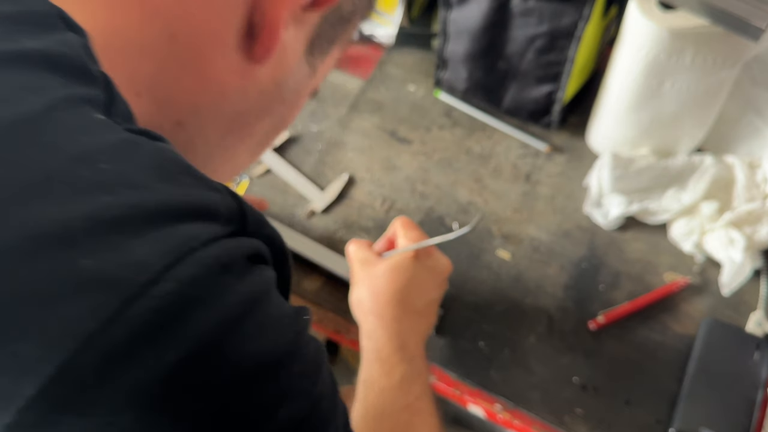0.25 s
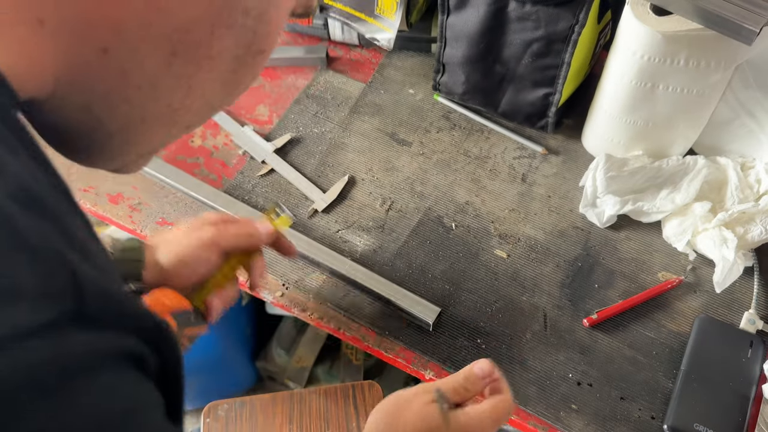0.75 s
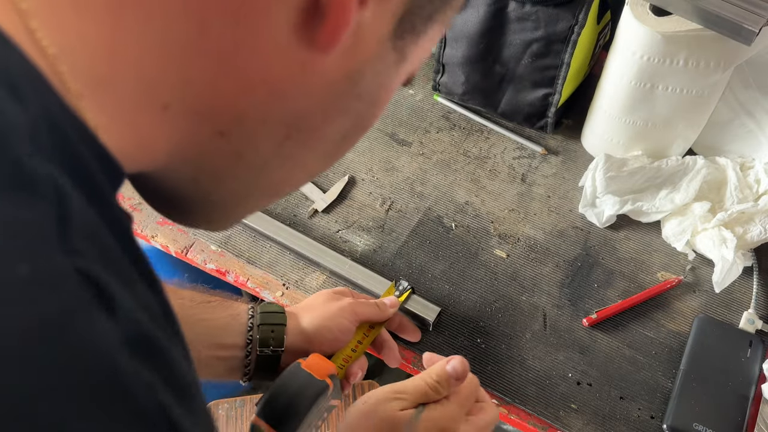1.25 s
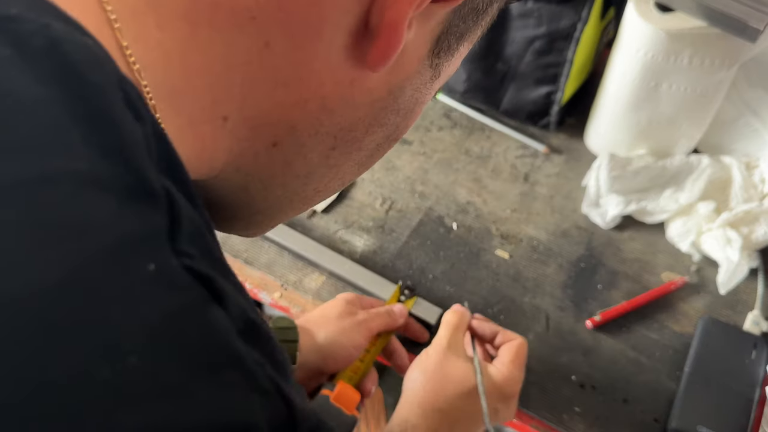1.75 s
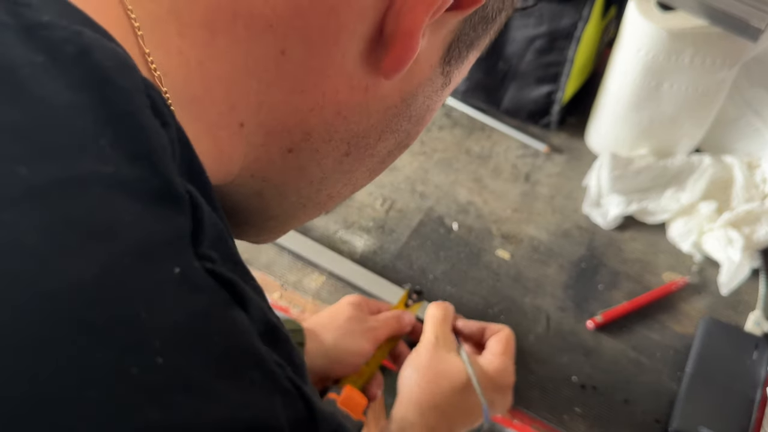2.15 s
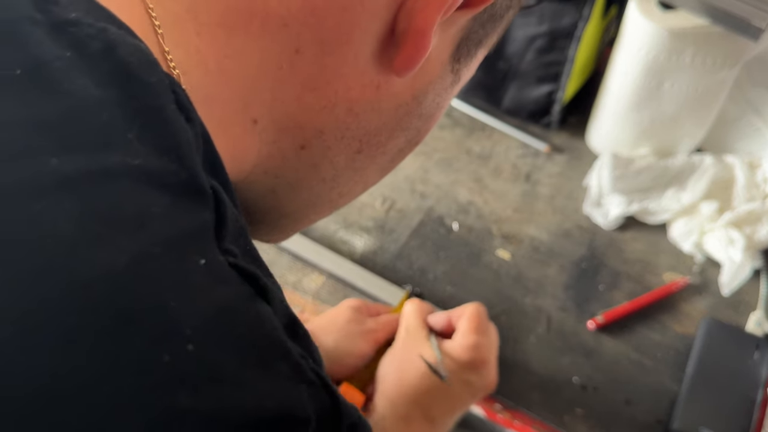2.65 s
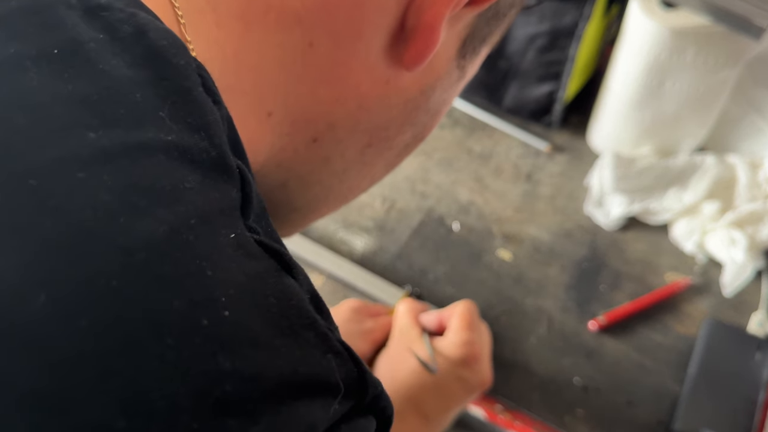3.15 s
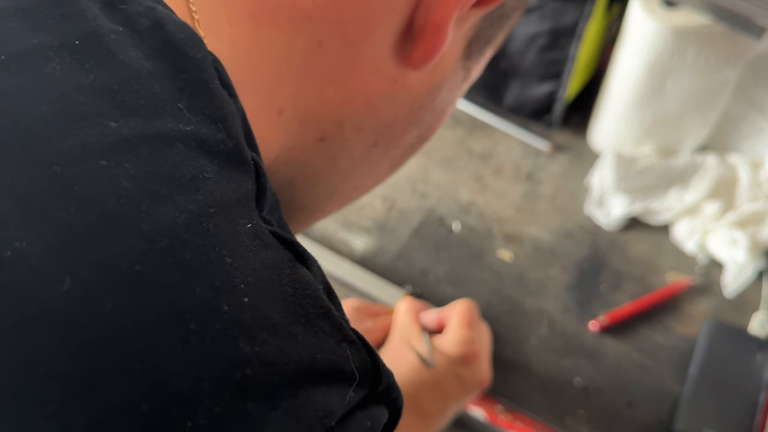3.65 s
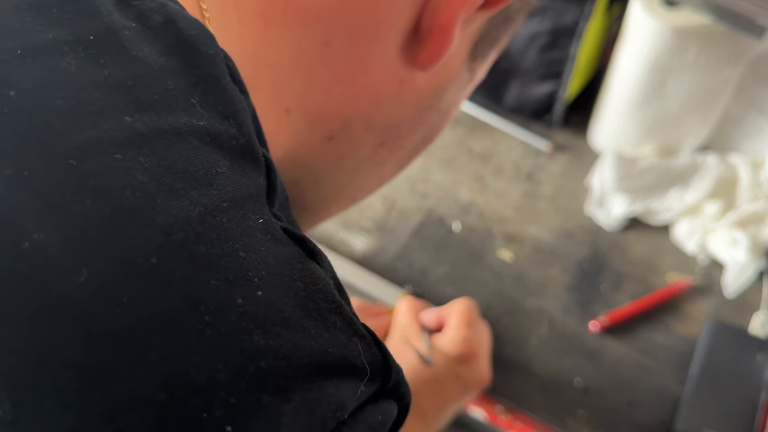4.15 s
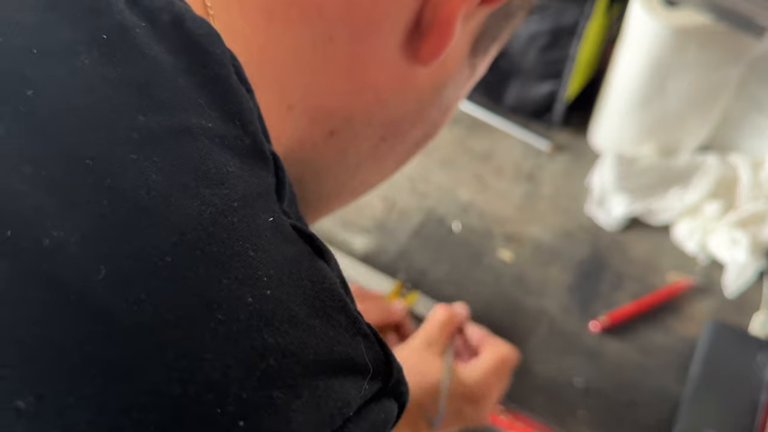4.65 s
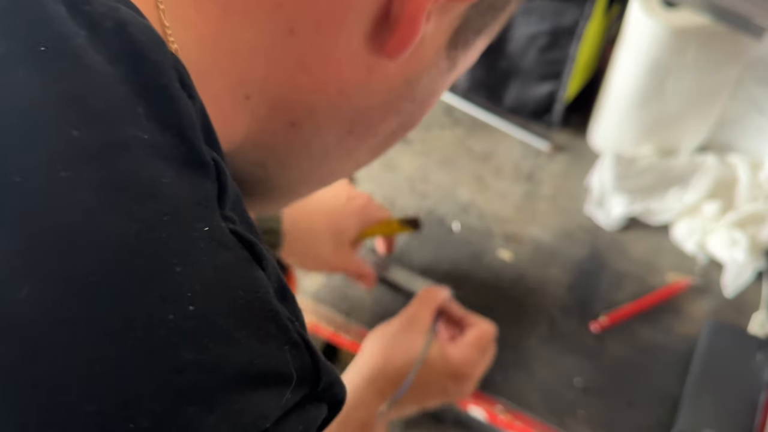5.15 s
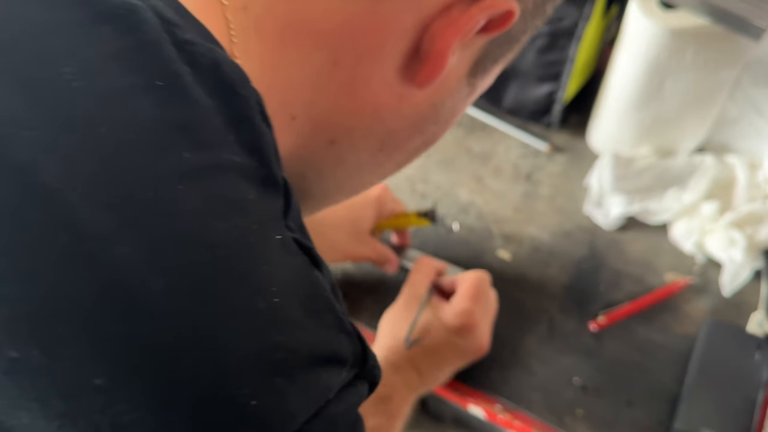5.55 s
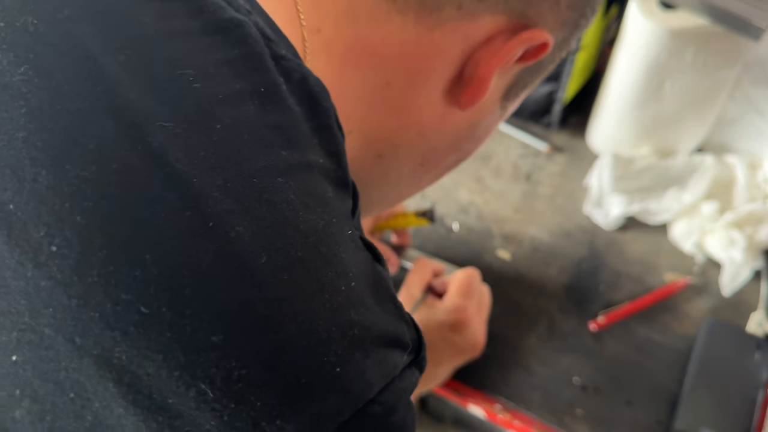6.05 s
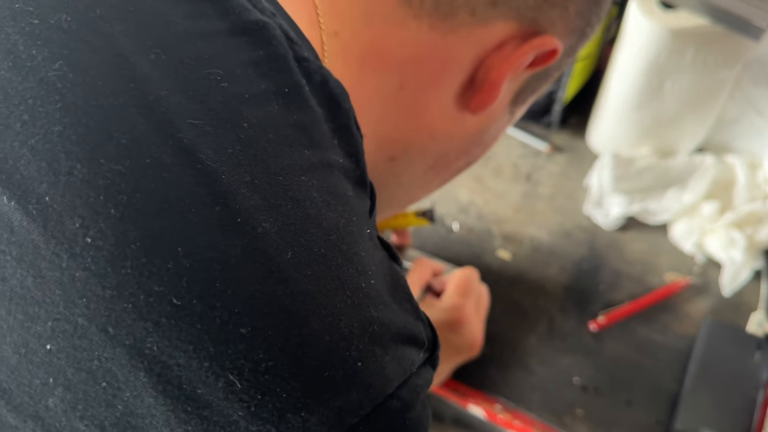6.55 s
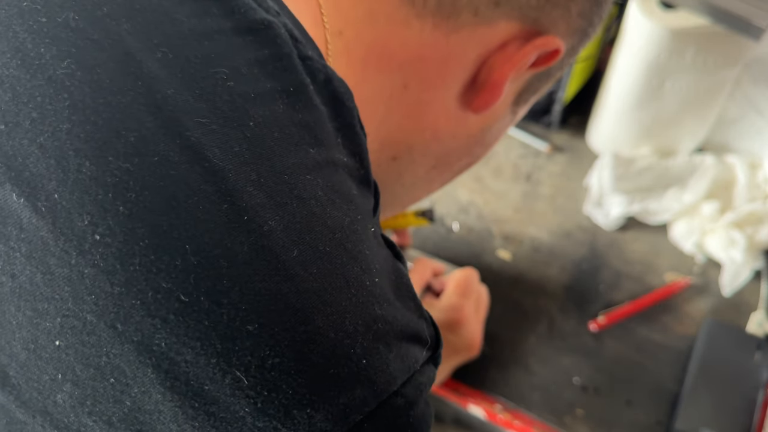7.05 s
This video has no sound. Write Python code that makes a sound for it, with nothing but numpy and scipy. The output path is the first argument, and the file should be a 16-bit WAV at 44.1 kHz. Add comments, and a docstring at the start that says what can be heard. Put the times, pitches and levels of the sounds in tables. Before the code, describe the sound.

In a quiet workshop, distant birds whistle throughout. A steel measuring tape ticks faintly, then snaps in a tight bright cluster just after one second. After a long near-silence, a square metal tube drops on the bench with a hard, booming clack, chatters, and drags briefly as the plastic tape case rocks. Soft hollow taps and hand shuffling finish. Close phone microphone, stereo, little reverberation.

```python
"""Bird whistles over a quiet room come first; almost at once a steel tape ticks and a square steel tube is tapped.
The tape also rustles and its plastic case rocks; the tube drops, chatters and drags on a bench that booms.
Ticks are short noise bursts with a dense ring; blows ring banks of decaying modes; drags and rubs are random slips.
Birds are gliding sines, an insect is throbbing narrow noise and the room is shaped noise."""
import sys
import numpy as np
from scipy import signal
from scipy.fft import rfft, irfft
from scipy.io import wavfile
from scipy.ndimage import uniform_filter1d

SR = 44100
rng = np.random.default_rng(int(sys.argv[2]) if len(sys.argv) > 2 else 0)


def output_pcm(signal):
    """Save a mono or channel-first signal as 16-bit PCM at the path in sys.argv[1].

    Samples are clipped to [-1, 1] before scaling.
    """
    pcm = np.clip(np.atleast_2d(signal).T, -1, 1) * 32767
    wavfile.write(sys.argv[1], SR, np.round(pcm).astype(np.int16))


N = 321489
T = np.arange(N) / SR


def amp(db):
    """Gain of a level in dB."""
    return 10 ** (np.asarray(db) / 20)


def unit(x):
    """Scaled to rms 1."""
    return x / np.sqrt(np.mean(x ** 2))


def band(x, lo_hz, hi_hz):
    """Steep band-pass."""
    return signal.sosfilt(signal.butter(3, [lo_hz, hi_hz], "band", fs=SR, output="sos"), x)


def decay(t, t60_s):
    """Exponential fade that loses 60 dB in t60_s."""
    return np.exp(-np.log(1000) * t / t60_s)


def ring(force, modes):
    """A force sets each decaying mode ringing."""
    out = 0
    for hz, db, t60_s in modes:
        pole = np.exp(2j * np.pi * hz / SR - np.log(1000) / (t60_s * SR))
        out = out + amp(db) * signal.lfilter([1], [1, -pole], force).imag
    return out


def walk(count, smooth):
    """Smooth random wander of rms 1; smooth is in samples."""
    return unit(uniform_filter1d(uniform_filter1d(rng.standard_normal(count), smooth), smooth))


def curve(rows, column):
    """Gain along a dB column, silent outside the rows."""
    rows = np.array(rows)
    return amp(np.interp(T, rows[:, 0], rows[:, column], left=-150, right=-150))


def grit(rate_hz, scatter_db):
    """Random slips, a few much larger than the rest."""
    slips = (rng.random(N) < rate_hz / SR) * rng.standard_normal(N)
    return unit(slips * amp(scatter_db * rng.exponential(size=N)))


def add(out, start_s, x):
    """Mixes x in at start_s."""
    i = int(start_s * SR)
    out[i:i + len(x)] += x[:N - i]


def blow(modes, peak_db, push_s, crack):
    """A short push rings the modes, each more or less at random; rough contact adds a crack of noise."""
    t = T[:SR // 2]
    offsets_db = 1.5 * rng.standard_normal(len(modes))
    struck = [(hz, db + offset_db, t60_s) for (hz, db, t60_s), offset_db in zip(modes, offsets_db)]
    click = 1. * (t == 0)
    sound = ring(click, struck) * (1 - np.exp(-t / push_s))
    rough = unit(band(rng.standard_normal(len(t)), modes[0][0], modes[-1][0] * 1.166))
    rough = rough * (t / push_s).clip(0, 1) * np.exp(-t / 0.021)
    sound = sound / np.abs(sound).max() + crack * rough
    return amp(peak_db) * sound / np.abs(sound).max()


def tail(x, t60_s, db, damp_hz):
    """Reflections: a decaying noise for each port, band-limited from 350 Hz to damp_hz."""
    t = T[:SR]
    ports = []
    for _ in range(2):
        echo = band(rng.standard_normal(SR), 350, damp_hz) * decay(t, t60_s) * (t > .006)
        echo = echo / np.sqrt(np.sum(echo ** 2))
        ports.append(amp(db) * signal.fftconvolve(x, echo)[:N])
    return np.array(ports)


# steel tape ticks: start_s, ring_db (peak), brightness_db (top over ring, before TICK_TOP_DB),
# t60_s (limited to 0.01-0.4 when played), middle_db (peak)
TAPE_TICKS = [(0.1, -56, 3.5, 0.22, -65), (0.334, -62.5, 4, 0.43, -62), (0.363, -68, 11, 0.087, -67),
              (0.6, -62.5, 1, 0.073, -65), (0.7954, -60, -4, 0.11, -50), (1.1698, -42.5, 5, 0.06, -41),
              (1.191, -27.5, 0, 0.15, -40), (1.195, -25, -5, 0.14, -45), (1.2106, -24.5, 6, 0.043, -38),
              (1.2135, -22.5, -1, 0.04, -42), (1.2315, -40.5, -1, 0.3, -50), (1.386, -52.5, 11.5, 0.4, -58),
              (1.439, -30.5, 0, 0.14, -54.5), (1.97, -53.5, -5, 0.41, -50.5),
              (2.0927, -69, 17.5, 0.091, -73), (4.57, -47.5, 13, 0.13, -55), (4.6679, -32, 0, 0.89, -41.5),
              (4.8985, -45.5, 5, 0.26, -44.5), (5.077, -50.5, -13, 0.29, -65), (5.302, -50, -1, 0.028, -50),
              (6.152, -70.5, 3, 0.08, -71.5), (7.1105, -50.5, 1, 0.044, -57)]
# ring of the thin steel tape: pitch_hz, level_db, t60_s
TAPE_MODES = [(7843, -14, .2), (8340, -12, .15), (8650, -10, .15), (8995, -6, .15), (9207, -3, .12),
              (9410, 0, .15), (9666, -4, .12), (9878, -8, .2), (10170, -4, .08), (10440, -8, .12),
              (11030, -10, .1)]
MIDDLE_HZ, RING_HZ, SHEEN_HZ = (2500, 6200), (7900, 10600), (12200, 16500)
TICK_TOP_DB, TICK_RISE_S, MIDDLE_FADE_S = -6, 0.001167, 0.017


def ticks():
    """The thin tape clicks as flickering noise with a dense ring; its middle band sheds level early."""
    out, t = np.zeros(N), T[:SR // 3]
    for start_s, ring_db, bright_db, t60_s, middle_db in TAPE_TICKS:
        fade = decay(t, np.clip(t60_s, .01, .4)) + np.exp(-t / 0.004)
        flicker_db = 4 * np.exp(-t / .05) * walk(len(t), smooth=60)
        attack = (t / TICK_RISE_S).clip(0, 1)
        noise = rng.standard_normal(len(t)) * fade * amp(flicker_db) * attack
        contact = noise * (t < .006)
        body = unit(band(noise, *RING_HZ)) + 0.69 * unit(ring(contact, TAPE_MODES))
        top = band(noise, *SHEEN_HZ)
        middle = band(noise * (0.36 + np.exp(-t / MIDDLE_FADE_S)), *MIDDLE_HZ)
        top_db = ring_db + TICK_TOP_DB + bright_db
        for db, layer in ((ring_db, body), (top_db, top), (middle_db, middle)):
            add(out, start_s, amp(db) * layer / np.abs(layer).max())
    return out


# the tube lands and bounces: start_s, bending_db (0.5-1.7 kHz), wall_db,
# free_share (part of the free ring time that the hand leaves)
TUBE_BOUNCES = [(4.698, -20, -27.5, 1), (4.715, -27.5, -25, 0.75), (4.73, -31, -26, 0.49),
                (5.3, -59.5, -48.5, .25), (5.615, -67, -61.5, 0.16)]
# bending of the tube: pitch_hz, level_db, t60_s
BENDING_MODES = [(579, -12, .1), (694, -10, .12), (754, -3, .12), (888, -6, .12), (1039, -3, .12),
                 (1250, -9, .08), (1444, -6, .13), (1626, -12, .1)]
# ring of the tube wall: pitch_hz, level_db, t60_s (free of the hand)
WALL_MODES = [(1941, -11, .12), (1996, -6, .14), (2197, -12, .12), (3123, -7, .12), (3179, 0, .12),
              (3246, -18, .1), (3682, -22, .12), (4509, -5, .15), (5120, -22, .13), (5520, -27, .12),
              (5959, -24, .13), (6500, -30, .12), (7397, -23, .16), (8123, -18, .13)]


def bounces():
    """Each landing bends the tube and rings its wall, which the hand damps."""
    out = np.zeros(N)
    for start_s, bending_db, wall_db, free_share in TUBE_BOUNCES:
        held = [(hz, db, t60_s * free_share) for hz, db, t60_s in WALL_MODES]
        add(out, start_s, blow(BENDING_MODES, bending_db, 0.00041, 0.41))
        add(out, start_s, blow(held, wall_db, 0.009, 0.0358))
    return out


# bench boom: pitch_hz, level_db, t60_s
BOOM_MODES = [(58, -22, .2), (82, 2, .3), (116, -3, .25)]
# bench body: pitch_hz, level_db, t60_s
BENCH_MODES = [(187, -10, .09), (250, -16, .08), (317, -2, .06), (378, 0, .06), (460, -11, .05)]
# low hollow tones: pitch_hz, level_db, t60_s
CAVITY_MODES = [(545, 0, .07), (610, -6, .05)]


def bench_blow(out, start_s, boom_db, bench_db, cavity_db):
    """Bench body, hollow tone, then the boom, which slower bending waves bring last."""
    add(out, start_s + 0.007, blow(BOOM_MODES, boom_db, 0.0039, 0))
    add(out, start_s + 0.0017, blow(BENCH_MODES, bench_db, 0.0015, .45))
    add(out, start_s + .004, blow(CAVITY_MODES, cavity_db, .006, .15))


# hands, tape case and tube thud on the bench: start_s, level_db, boom_db (weight over level_db)
BENCH_THUDS = [(0.112, -47.5, -28), (0.125, -53.5, 6.5), (0.336, -53.5, -2.5), (1.21, -50.5, -2.5),
               (1.447, -56.5, -3), (1.989, -57.5, -27), (2.468, -51.5, -11.5), (4.476, -52, -15),
               (4.697, -28.5, 6), (4.7022, -16, -9), (4.847, -45.5, 3.5), (4.907, -45.5, 7),
               (4.952, -51, 8), (5.005, -47.5, 7.5), (5.035, -50, 6.5)]
THUD_CAVITY_DB = -20  # hollow tone over the thud


def thuds():
    """Hands, case and tube knock the bench into its body tones and boom."""
    out = np.zeros(N)
    for start_s, db, weight_db in BENCH_THUDS:
        bench_blow(out, start_s, db + weight_db, db, db + THUD_CAVITY_DB)
    return out


# scriber and fingers tap the tube: start_s, level_db, low_db (lowest hollow tone over level_db),
# second_db (added to the second hollow mode)
TUBE_TAPS = [(0.097, -63.5, 7.5, -8), (5.689, -56.5, 3.5, -20), (5.716, -48.5, 0, -18),
             (5.84, -65.5, 8.5, -14), (5.854, -50, 0.5, -15), (6.309, -59, -1, -16),
             (6.424, -45.5, -17, -6), (6.899, -50.5, -19, 1.5), (7.016, -55.5, -12, -10),
             (7.112, -48.5, -24, -7)]
# hollow tube tones: pitch_hz, level_db, t60_s
HOLLOW_MODES = [(1025, 0, .03), (1560, 0, .025), (2300, -20, .025), (3400, -24, .025), (4450, -21, .025)]
TAP_BENCH_DB, TAP_BOOM_DB = -3.5, -9  # what a tap passes on to the bench


def gripped(modes, second_db):
    """The hand's grip shifts each tone a little from tap to tap and sets the second tone's level."""
    held = []
    for k, (hz, db, t60_s) in enumerate(modes):
        shifted_hz = hz * (1 + .02 * rng.standard_normal())
        held.append((shifted_hz, db + second_db * (k == 1), t60_s))
    return held


def taps():
    """The hollow tap comes first, then the bench answers."""
    out = np.zeros(N)
    for start_s, db, low_db, second_db in TUBE_TAPS:
        add(out, start_s, blow(gripped(HOLLOW_MODES, second_db), db, .002, .1))
        bench_blow(out, start_s, db + TAP_BOOM_DB, db + TAP_BENCH_DB, db + low_db)
    return out


# the plastic tape case rocks on the bench: start_s, level_db (peak)
CASE_ROCKS = [(4.845, -35.5), (4.951, -42.5), (5.004, -53), (5.037, -52)]
# tones of the case: pitch_hz, level_db, t60_s
CASE_MODES = [(329.4, 3.5, 0.079), (696, -1, 0.067), (1312, -5, 0.067), (1362, -12, 0.083),
              (2060, -13, 0.072)]


def rocks():
    """Each rock of the case rings its short plastic modes."""
    out = np.zeros(N)
    for start_s, db in CASE_ROCKS:
        add(out, start_s, blow(CASE_MODES, db, 0.0016, 0.12))
    return out


# after landing the tube chatters: start, rise, then a steady fall
CHATTER_S, CHATTER_RISE_S, CHATTER_DB, CHATTER_FALL_DB_S = 4.68, 0.042, -35.5, 316


def chatter_gain():
    """Gain of the chatter: a quick swell, then a steady fall in dB."""
    since_s = T - CHATTER_S
    rise = (since_s / CHATTER_RISE_S).clip(0, 1) ** 2
    fall_db = CHATTER_FALL_DB_S * (since_s - CHATTER_RISE_S).clip(0)
    return rise * amp(CHATTER_DB - fall_db)


# the tube slides over the bench: start_s, pressure_db, wall_db, tone_db (the wall's 4.5 kHz tone over wall_db)
TUBE_SLIDE = [(5.06, -79, -91, 0), (5.085, -55, -69, 1), (5.12, -51, -62.5, 2), (5.18, -55, -65.5, -11),
              (5.23, -43, -61.5, 6), (5.265, -48.5, -61, 11), (5.297, -57.5, -61.5, 6),
              (5.335, -68.5, -81, -6), (5.45, -75, -93, 0)]
# layer shares in dB: boom, grind, scrape, tape ring, tape top
SLIDE_MIX_DB = (9.5, 1, -15, -13.5, -18)
# same layers while the tube chatters, in dB
CHATTER_MIX_DB = (11, 4, -4, -6.5, -24)
BOOM_LAG_S = 0.044
RUBBED_LO_HZ, RUBBED_HI_HZ, RUBBED_DB = 5000, 7500, 13  # rubbing favours these upper tones


def drag():
    """Uneven slips shake the bench, keep the tube ringing and scrape the tape; the boom builds up late."""
    slips, fine = grit(2500, 2.2), grit(6000, 2.0)
    boom = ring(slips, BOOM_MODES)
    grind = unit(ring(slips, BENCH_MODES)) + 0.23 * unit(ring(slips, BENDING_MODES))
    grind = grind + 0.58 * unit(band(slips, 330, 2100))
    scrape = band(slips, 1400, 3640) + 0.35 * band(fine, 3600, 7000)
    tape = unit(band(fine, *RING_HZ)) + unit(ring(fine, TAPE_MODES))
    layers = boom, grind, scrape, tape, band(fine, *SHEEN_HZ)

    slide, chatter = curve(TUBE_SLIDE, column=1), chatter_gain()
    gains = [amp(a) * slide + amp(b) * chatter for a, b in zip(SLIDE_MIX_DB, CHATTER_MIX_DB)]
    gains[0] = np.roll(gains[0], int(BOOM_LAG_S * SR))
    out = sum(gain * unit(layer) for gain, layer in zip(gains, layers))

    for hz, db, t60_s in WALL_MODES:
        rubbed = curve(TUBE_SLIDE, column=2) * amp(RUBBED_DB * (RUBBED_LO_HZ < hz < RUBBED_HI_HZ))
        if hz == 4509:
            rubbed = rubbed * curve(TUBE_SLIDE, column=3)
        out = out + (rubbed + chatter) * amp(db) * unit(ring(fine, [(hz, 0, t60_s)]))
    return out


# brief rubs of tape and fingers: start_s, length_s, level_db, brightness_db (top over level_db)
TAPE_RUBS = [(0.393, 0.073, -79.5, 6.5), (0.459, 0.051, -76.5, 6), (1.227, 0.095, -62, 4),
             (5.08, 0.077, -59.5, -6), (1.929, 0.061, -72, 0), (2.012, 0.072, -79.5, 6),
             (2.389, 0.076, -73.5, -9), (2.632, .03, -80, -7), (2.68, 0.1, -67.5, -9),
             (4.511, 0.33, -66, -4), (4.756, 0.14, -61.5, -4), (4.969, 0.076, -71.5, -13),
             (6.16, 0.049, -81.5, 1), (6.39, 0.063, -70.5, -11), (7.101, 0.06, -82, 5)]


def rustle():
    """Dense tiny slips of tape and skin, heard in the treble."""
    out, slips = np.zeros(N), grit(6000, 2.0)
    low, high = unit(band(slips, *RING_HZ)), unit(band(slips, *SHEEN_HZ))
    for start_s, length_s, db, bright_db in TAPE_RUBS:
        i, n = int(start_s * SR), int(length_s * SR)
        swell = np.sin(np.linspace(0, np.pi, n)) ** 0.67
        rub = low[i:i + n] + amp(bright_db) * high[i:i + n]
        add(out, start_s, swell * amp(db) * rub)
    return out


# hands shifting on the work, joined into one level curve: time_s, level_db
HAND_SHUFFLE = [(5.4, -72.5), (5.9, -73), (6.1, -79.5), (6.5, -73.5), (6.75, -75.5), (7.0, -67.5),
                (7.29, -77)]


def shuffle():
    """Soft, scattered contacts of hands murmur through the bench and the hollow tube."""
    slips = uniform_filter1d(grit(700, 2.5), 20)
    murmur = unit(ring(slips, BENCH_MODES)) + 0.31 * unit(ring(slips, CAVITY_MODES + HOLLOW_MODES))
    murmur = murmur + 1.25 * unit(band(slips, 130, 1110)) + 0.65 * unit(ring(slips, BOOM_MODES))
    return curve(HAND_SHUFFLE, column=1) * unit(murmur)


# bird notes: start_s, length_s, first_hz, last_hz, level_db, spread_hz (size of the pitch wobble)
BIRD_NOTES = [(0.0, 0.27, 5220, 4410, -82, 320), (0.0, 0.12, 7400, 6850, -78.5, 390),
              (0.217, 0.12, 6800, 6000, -76.5, 290), (0.339, 0.095, 7380, 7470, -78.5, 63),
              (0.966, 0.14, 1550, 1800, -74, 10), (1.034, 0.043, 2560, 1970, -79, 13),
              (1.068, 0.14, 1996, 1993, -64.5, 29), (1.109, 0.056, 2230, 2360, -65.5, 26),
              (1.488, 0.062, 1960, 2080, -69.5, 11.3), (1.553, 0.12, 2070, 2410, -78.5, 13),
              (1.428, 0.12, 1677, 1550, -74.5, 99), (1.616, 0.12, 1997, 1953, -72, 20),
              (1.849, 0.15, 3010, 3230, -76.5, 196), (1.982, 0.097, 2380, 2440, -73, 125),
              (2.008, 0.13, 1880, 2150, -73.5, 11), (2.094, 0.1, 3070, 2353, -70, 220),
              (2.143, 0.176, 1930, 1804, -72.5, 5.3), (2.17, 0.155, 2256, 2276, -73, 60),
              (2.343, 0.11, 2336, 2400, -74.5, 11), (2.457, 0.041, 7070, 5770, -74, 290),
              (2.513, 0.13, 5184, 5170, -74, 60), (2.69, 0.034, 4700, 4360, -80, 100),
              (2.79, 0.051, 4100, 4030, -79, 90), (2.854, 0.062, 3450, 3270, -75, 46),
              (2.959, 0.28, 3323, 3390, -82.5, 9), (2.832, 0.21, 2090, 2230, -79, 10),
              (3.1, 0.13, 2390, 2870, -77, 130), (3.17, 0.1, 1854, 1820, -66, 4.4),
              (3.248, 0.086, 1926, 2243, -67.5, 110), (3.295, 0.14, 2790, 2670, -76.5, 114),
              (3.396, 0.12, 2446, 2203, -69.5, 21), (3.534, 0.072, 2285, 1894, -65, 62),
              (3.729, 0.2, 2570, 2587, -67, 29), (3.73, 0.14, 2420, 2383, -69, 29),
              (3.872, 0.073, 2810, 3360, -64.5, 65), (4.004, 0.11, 3246, 3214, -85.5, 20),
              (4.148, 0.1, 3180, 3910, -74.5, 270), (4.201, 0.13, 3500, 2576, -74.5, 400),
              (5.452, 0.085, 1955, 1946, -77, 4.8), (5.477, 0.14, 1830, 1610, -73.5, 11),
              (5.7, 0.046, 2385, 2337, -71.5, 20), (5.738, 0.093, 2324, 2000, -73.5, 41),
              (5.857, 0.14, 2212, 2327, -76.5, 217), (6.121, 0.076, 2772, 2620, -68, 22),
              (6.179, 0.12, 2546, 2246, -69, 105), (6.294, 0.09, 2175, 1890, -72, 42),
              (6.598, 0.18, 2280, 2205, -75.5, 42), (6.712, 0.067, 2100, 1950, -75.5, 15),
              (6.77, 0.11, 2890, 4600, -83, 380), (6.85, 0.084, 2615, 2600, -76.5, 54),
              (7.194, 0.16, 2495, 2390, -75.5, 28)]
BIRD_PAN_DB, BIRD_LEAD_S = 3.5, .0004  # left over right, and ahead of it
YARD_T60_S, YARD_DB = 0.68, -2.5


def birds():
    """Gliding whistles; a quick pitch wobble smears the trilled ones. They reach the left port first."""
    out = np.zeros(N)
    for start_s, length_s, first_hz, last_hz, db, spread_hz in BIRD_NOTES:
        u = np.linspace(0, 1, int(length_s * SR))
        wobble = walk(SR, smooth=70)[:len(u)]
        flutter = amp(3.9 * walk(SR, smooth=400)[:len(u)])  # air on the way stirs the level
        hz = first_hz + (last_hz - first_hz) * u + spread_hz * wobble
        whistle = np.sin(2 * np.pi * np.cumsum(hz) / SR)
        add(out, start_s, np.sqrt(2) * amp(db) * flutter * np.sin(np.pi * u) ** .6 * whistle)
    left, right = out + tail(out, YARD_T60_S, YARD_DB, 9000)
    right = np.roll(right, int(BIRD_LEAD_S * SR))
    return np.array([amp(BIRD_PAN_DB / 2) * left, amp(-BIRD_PAN_DB / 2) * right])


CRICKET_HZ, CRICKET_RATE_HZ, CRICKET_DB = 7550, 24, -87.5


def cricket():
    """A far insect throbs faintly and unevenly in a narrow band."""
    rate_hz = CRICKET_RATE_HZ * amp(.3 * walk(N, smooth=4000))
    throb = np.sin(np.pi * np.cumsum(rate_hz) / SR) ** 4
    throb = throb * amp(4 * walk(N, smooth=6000))
    hiss = band(rng.standard_normal((2, N)), CRICKET_HZ - 250, CRICKET_HZ + 250)
    return amp(CRICKET_DB) * unit(throb * hiss)


# colour of the room: pitch_hz, level_db (relative, per Hz)
ROOM_COLOUR = [(25, -25), (45, 3.5), (70, -3.5), (120, -8.5), (370, -14), (1260, -19.5), (2200, -21),
               (2900, -31.5), (6000, -34), (8500, -28), (10700, -47.5), (13000, -38), (16000, -33)]
# left-right likeness of the room: pitch_hz, likeness (no unit; 1 same, -1 opposite)
ROOM_LIKENESS = [(60, 0.94), (130, 0.77), (290, 0.694), (640, -0.31), (1410, -0.26), (3100, 0.46),
                 (6820, -0.3), (15000, 0.14)]
ROOM_DB = -67.5


def room():
    """Steady air and distant rumble: shaped noise, most alike at the two ports in the bass."""
    log_hz = np.log(np.fft.rfftfreq(N, 1 / SR) + 1)
    (colour_hz, db), (likeness_hz, likeness) = np.transpose(ROOM_COLOUR), np.transpose(ROOM_LIKENESS)
    alike = np.clip(np.interp(log_hz, np.log(likeness_hz), likeness), -.95, .99)
    colour = amp(np.interp(log_hz, np.log(colour_hz), db))
    mid, side = (rfft(rng.standard_normal(N)) * colour for _ in range(2))
    signs = np.array([[1], [-1]])
    air = irfft(mid * np.sqrt(1 + alike) + signs * side * np.sqrt(1 - alike), N)
    return amp(ROOM_DB + walk(N, smooth=9000)) * unit(air)


# how bench sounds reach the ports: pitch_hz, lead_rad (left ahead), pan_db (left minus right)
BENCH_PORTS = [(0, 0, .5), (150, -.15, .8), (300, -.3, -2), (650, -1., .5), (1300, -.9, 1.5),
               (2200, 1., 2.7), (3200, 1.7, 2.7), (5000, 1., 2), (8000, 2.4, 1.7), (10400, .5, 1.7),
               (13000, -.2, 0), (16000, -2.6, 0)]
SHOP_T60_S, SHOP_DB = 0.27, -11


def scene():
    """Sounds at the bench reach the two ports with a phase and balance that depend on pitch."""
    work = ticks() + bounces() + thuds() + taps() + rocks() + drag() + rustle() + shuffle()
    port_hz, leads_rad, pans_db = np.transpose(BENCH_PORTS)
    hz = np.fft.rfftfreq(N, 1 / SR)
    lead_rad, pan_db = np.interp(hz, port_hz, leads_rad), np.interp(hz, port_hz, pans_db)
    sides = np.array([[1], [-1]])
    near = irfft(rfft(work) * amp(sides * pan_db / 2) * np.exp(.5j * sides * lead_rad), N)
    return near + tail(work, SHOP_T60_S, SHOP_DB, 8900) + birds() + cricket() + room()


NOTCH_HZ, NOTCH_Q, TOP_HZ = 11300, 6, 15850


def record(dry):
    """The phone cuts the deepest bass, has a dip from its port and cuts the top."""
    dry = signal.sosfilt(signal.butter(4, 45, "high", fs=SR, output="sos"), dry)
    dipped = signal.lfilter(*signal.iirnotch(NOTCH_HZ, NOTCH_Q, SR), dry)
    dry = .55 * dry + .45 * dipped
    return signal.sosfilt(signal.ellip(8, .2, 60, TOP_HZ, fs=SR, output="sos"), dry)


dry = scene()
out = record(dry)
output_pcm(out)
```